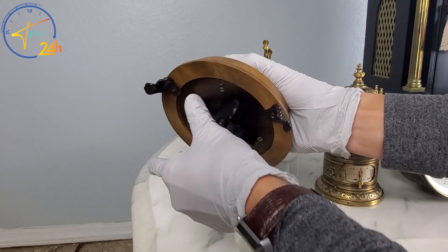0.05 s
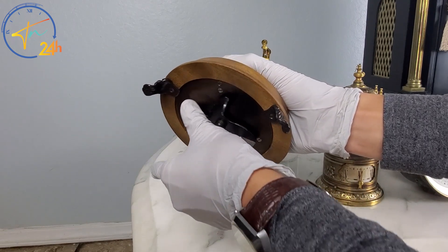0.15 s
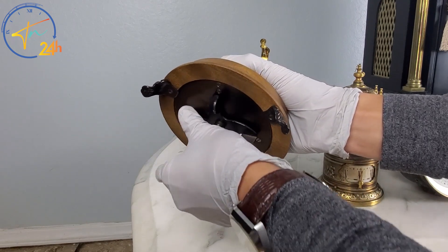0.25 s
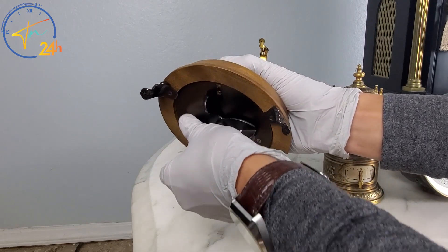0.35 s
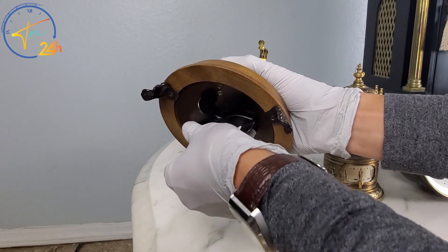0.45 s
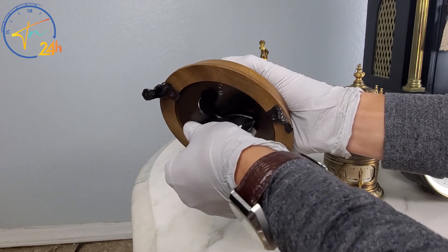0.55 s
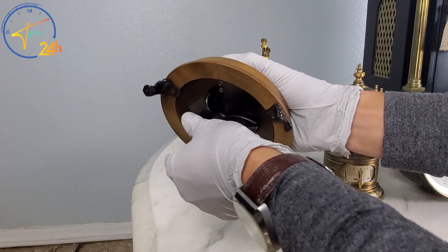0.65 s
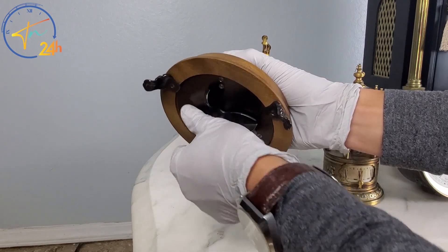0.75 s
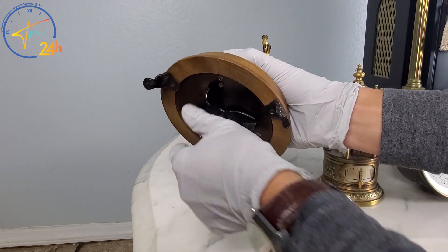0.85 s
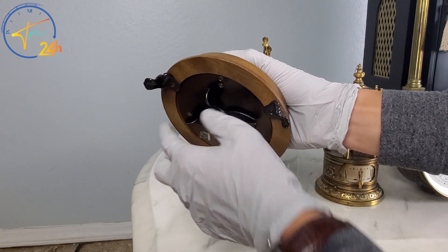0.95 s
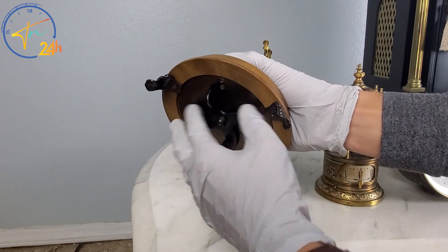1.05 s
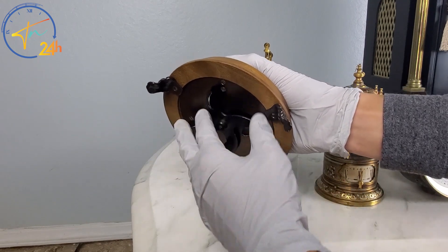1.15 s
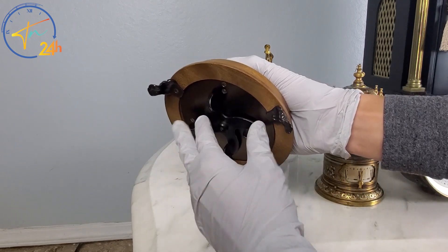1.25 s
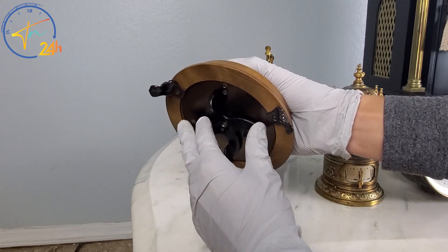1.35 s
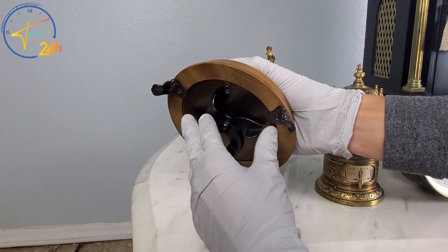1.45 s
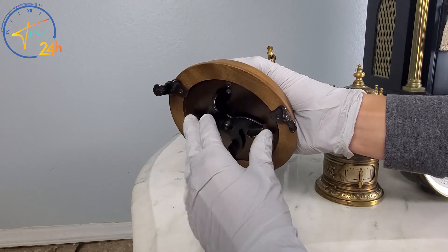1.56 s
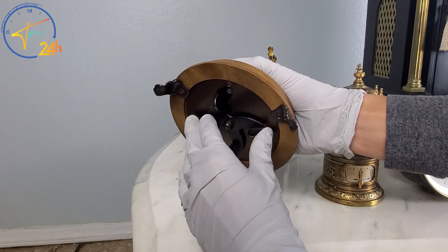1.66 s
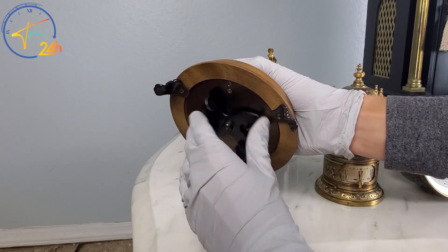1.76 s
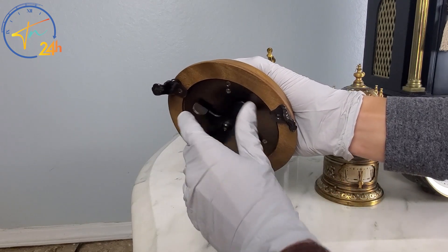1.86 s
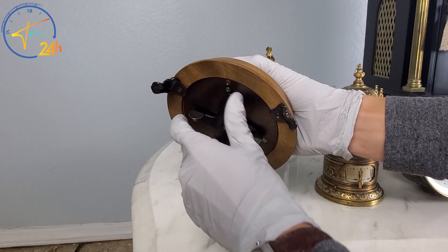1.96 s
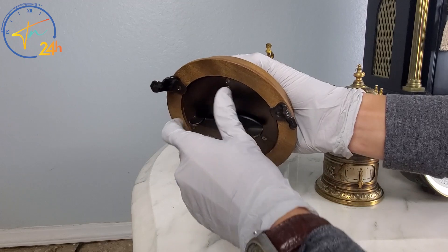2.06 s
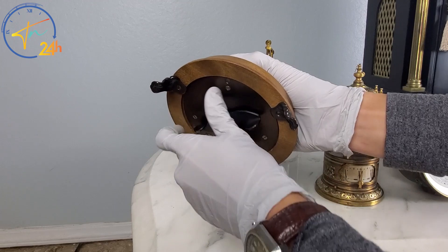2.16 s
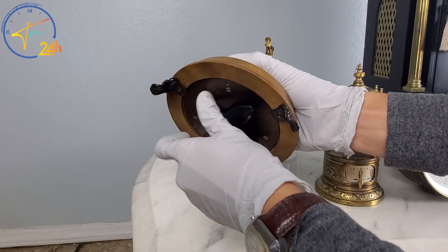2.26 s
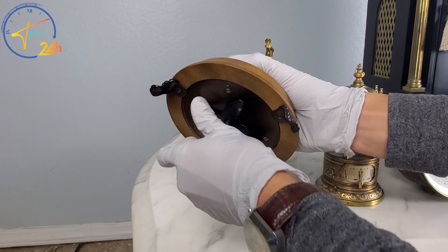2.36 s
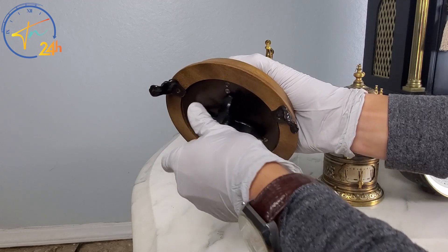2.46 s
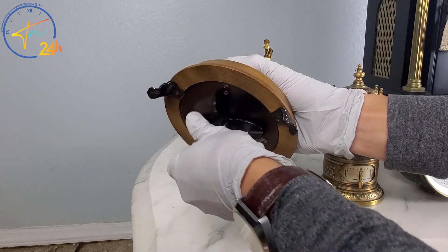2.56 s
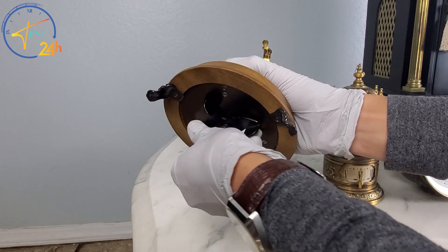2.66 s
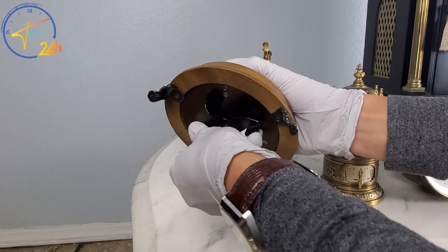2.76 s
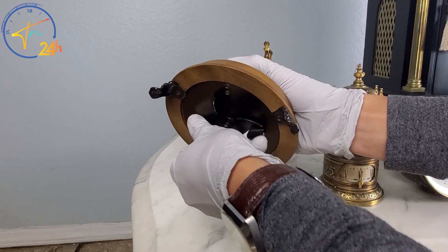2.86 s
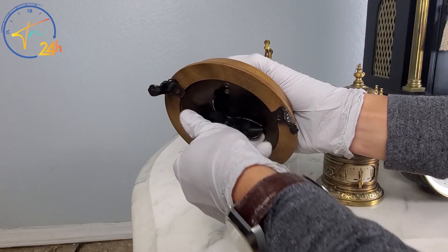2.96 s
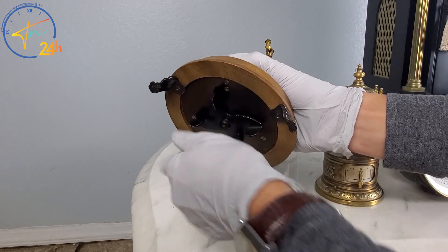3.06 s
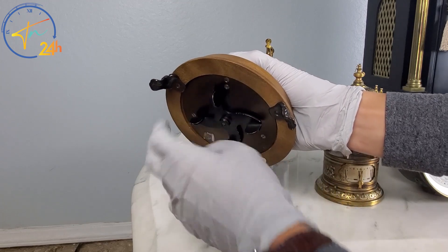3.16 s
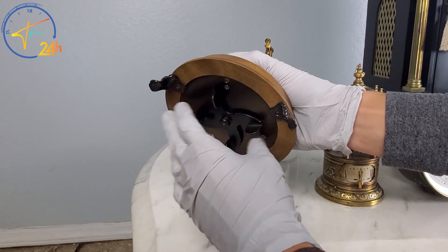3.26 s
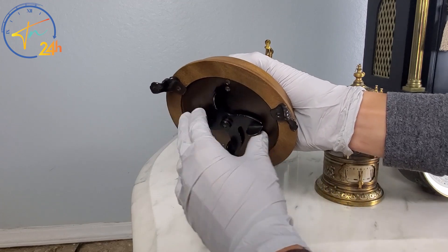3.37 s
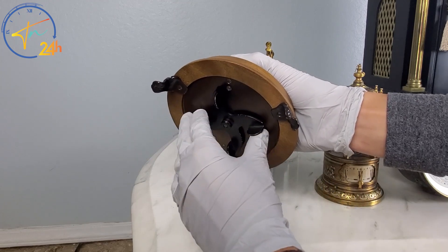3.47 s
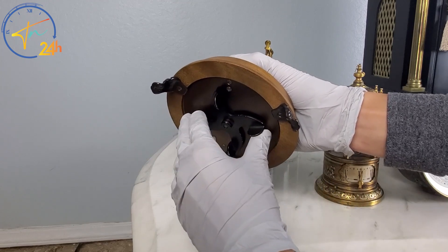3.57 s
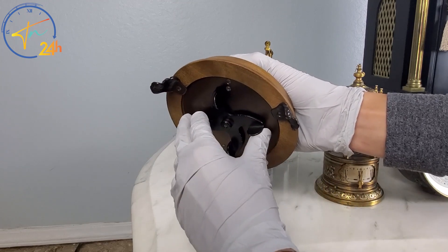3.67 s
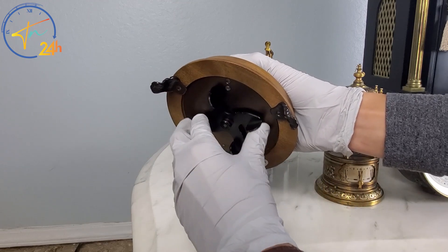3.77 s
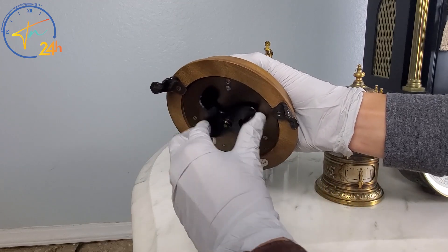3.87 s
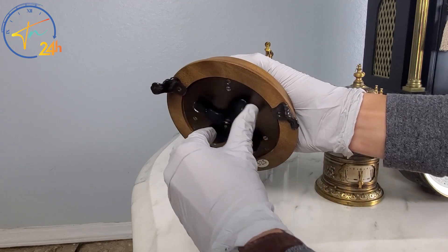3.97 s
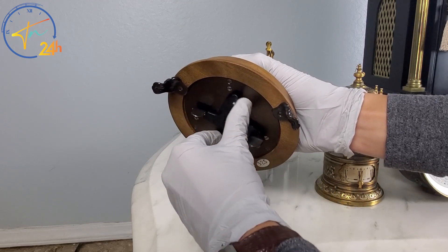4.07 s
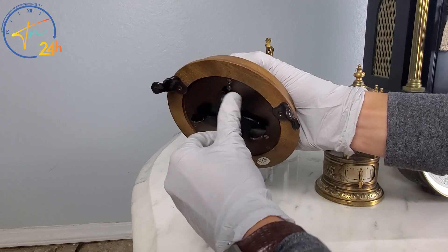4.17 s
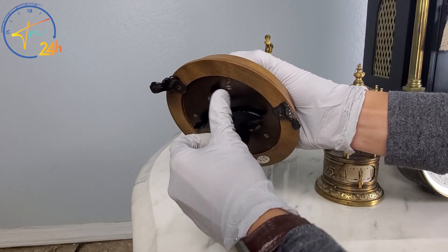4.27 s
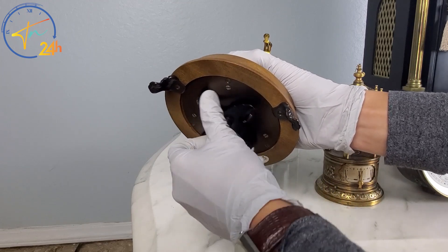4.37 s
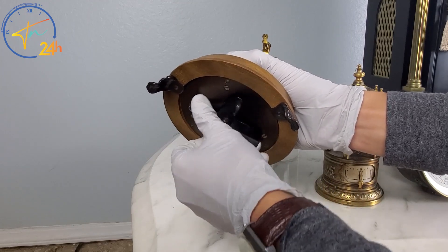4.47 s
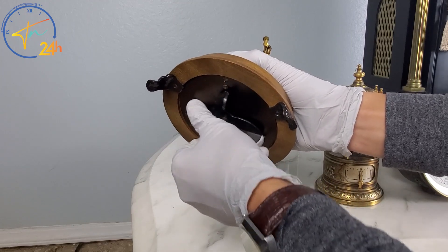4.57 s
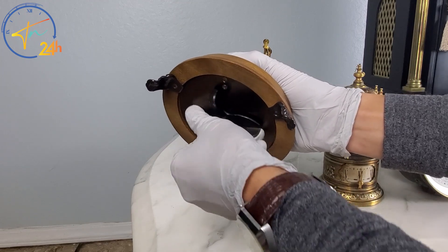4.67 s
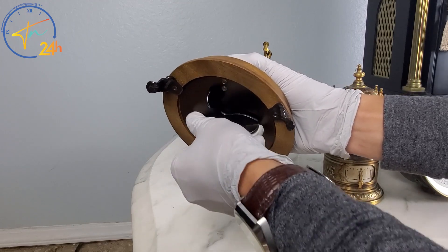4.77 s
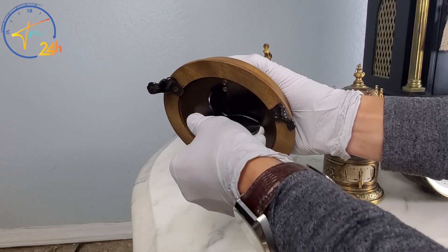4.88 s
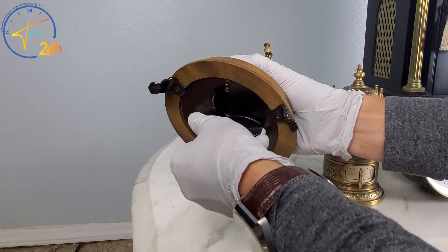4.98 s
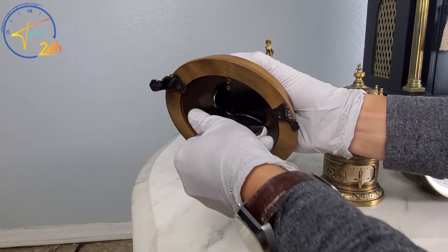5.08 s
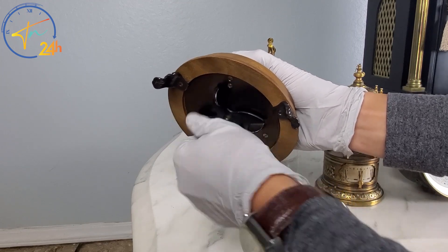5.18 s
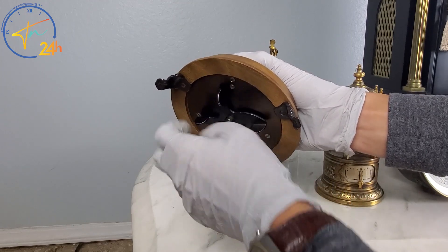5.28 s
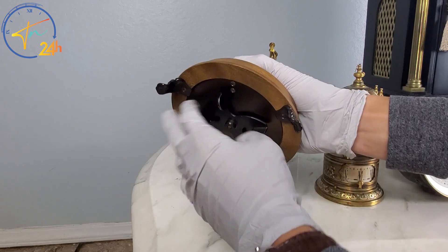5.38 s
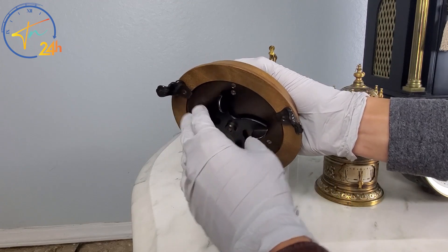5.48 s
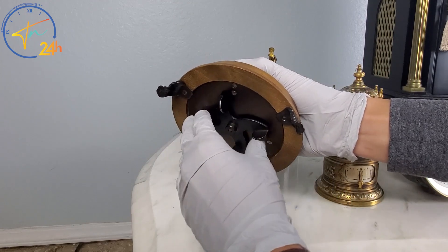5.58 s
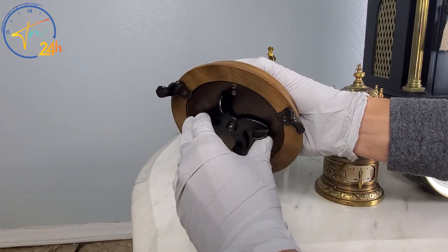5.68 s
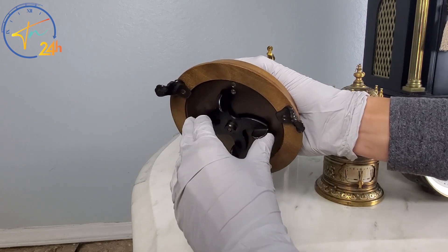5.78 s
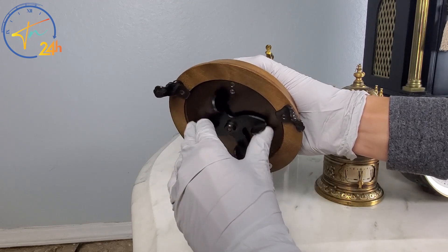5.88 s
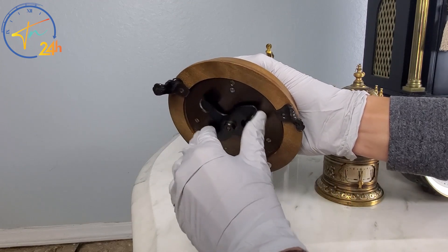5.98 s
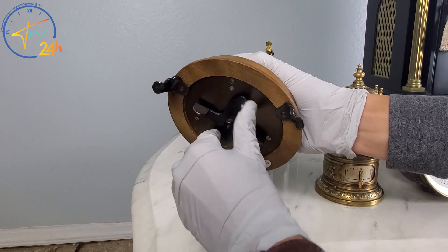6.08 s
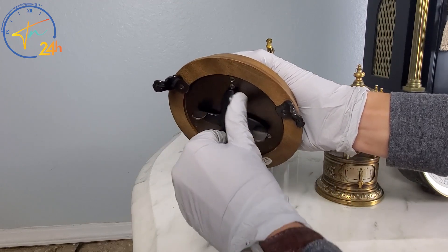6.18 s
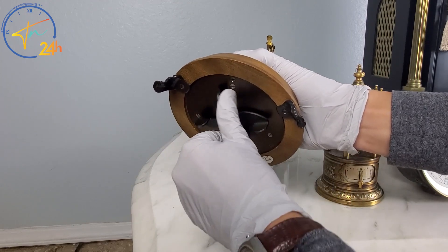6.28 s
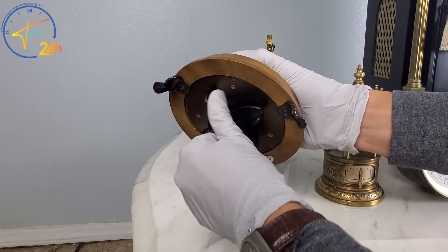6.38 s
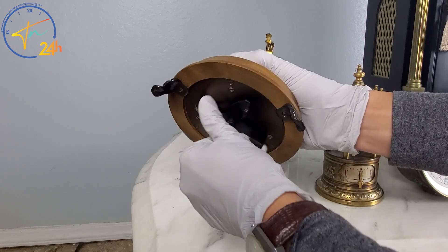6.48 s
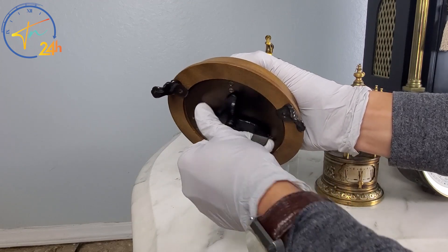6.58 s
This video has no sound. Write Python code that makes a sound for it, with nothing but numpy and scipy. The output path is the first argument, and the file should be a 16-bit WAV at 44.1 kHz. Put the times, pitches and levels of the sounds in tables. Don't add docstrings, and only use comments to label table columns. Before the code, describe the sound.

A small clock is wound by hand in four half turns, each a rapid run of bright ratchet clicks, with key clacks between.

```python
import sys
import numpy as np
from scipy import signal
from scipy.io import wavfile

SR = 44100
rng = np.random.default_rng(int(sys.argv[2]) if len(sys.argv) > 2 else 0)


def magnitude_from_level(level_db):
    exponent = np.asarray(level_db, float) / 20
    return 10 ** exponent


def waveform_to_disk(signal):
    frames = np.transpose(np.atleast_2d(signal))
    scaled = np.clip(frames, -1, 1) * 32767
    samples = np.round(scaled).astype(np.int16)
    wavfile.write(sys.argv[1], SR, samples)


N = 292383

# (f/Hz, level/dB per Hz)
AIR = [(13, -60), (22, -28.5), (43, -3), (87, 0.5), (100, -7.5), (118, -13.5), (294, -13.5), (1040, -27),
       (1130, -25.5), (2320, -31), (5310, -38.5), (7810, -43), (10600, -55), (14700, -28.5), (16000, -50)]
AIR_DB = -58.5
# (f/Hz, width/Hz, level/dB)
DRONES = [(86.1, 5.9, -62.5), (106, 25, -79), (299.2, 17, -70), (356.8, 7.5, -72.5), (391.5, 29, -69.5)]
# (f/Hz, correlation)
LIKENESS = [(60, 0.97), (99, 0.96), (160, 0.92), (270, 0.24), (450, -0.64), (740, -0.48), (1220, -0.63),
            (2010, -0.3), (3330, -0.04), (5500, -0.26), (9080, 0.16), (15000, -0.095)]
# (f/Hz, left-right/dB)
SIDES = [(60, -1), (180, -2.5), (550, 0), (1650, -1.5), (4970, -5.5), (15000, -4.5)]
# (delay/ms, left level/dB, right level/dB)
ECHOES = [(2.7, -12, -13), (5.7, -9, -17), (12.6, -14, -20), (17.5, -22, -23), (23.5, -21, -22),
          (28, -21, -26)]
# (f/Hz, t60/s)
ROOM_T60 = [(500, 0.43), (2000, 0.44), (5500, 0.36), (9000, 0.3), (15000, 0.25)]

# (f/Hz, level/dB per Hz)
GLOVE = [(1470, -54), (2500, -7.5), (3460, -17), (3720, -15.5), (7020, 0.5), (10000, -11.5), (15000, 4),
         (16000, -23)]
# (t/s, level/dB)
GRIP = [(0.0, -65.5), (0.81, -63), (1.09, -69), (1.42, -86), (1.73, -75), (2.16, -61), (2.66, -62),
        (2.76, -66), (3.05, -66.5), (3.43, -79), (3.72, -83), (3.91, -66), (4.43, -62.5), (4.95, -73.5),
        (5.34, -63), (5.6, -83), (5.86, -86), (6.0, -67.5), (6.63, -58)]
# (t/s, length/s, level/dB)
SWIPES = [
    (0.88, 0.058, -77),
    (1.384, 0.034, -72),
    (1.54, 0.017, -72),
    (1.718, 0.035, -51),
    (3.09, 0.13, -71),
    (3.347, 0.037, -72.5),
    (5.222, 0.04, -53),
    (5.408, 0.011, -75),
]
# (t/s, peak level/dB, length/ms)
KNOCKS = [(0.097, -53, 2.3), (0.138, -51, 6), (0.158, -56, 4), (2.158, -44.5, 3.3), (2.172, -50, 3),
          (2.185, -38.5, 2.1), (2.196, -40.5, 1.3), (2.21, -52.5, 2.5), (2.223, -52, 4.0), (2.238, -57, 3),
          (2.295, -54.5, 1.8), (2.811, -55.5, 7.8), (6.226, -56.5, 2.7)]
# (t/s, peak level/dB)
TICKS = [
    (0.9887, -50),
    (3.3413, -67),
    (5.3433, -64),
    (5.404, -56),
    (5.7162, -56.5),
]
# (t/s, peak level/dB, left-right/dB, bright edge level/dB, rattle/ms)
SLACK = [(0.5692, -35, -6.5, -55, 5), (0.6414, -44.5, 0, -55, 3.7), (1.693, -32, -6, -42, 8.5),
         (1.714, -44, -5, -63, 7.7), (2.7605, -32, -1, -51.5, 4.2), (2.8088, -49, -4, -54, 4),
         (3.7018, -53.5, -7, -75.5, 3.3), (3.7403, -31.5, -7.5, -47, 4), (3.7958, -47, -6, -71, 5),
         (4.738, -59, -5, -72, 6), (4.8851, -33.5, -1, -56.5, 3.4), (4.906, -65, -13, -58, 2.7),
         (4.945, -52, -6, -72, 4), (5.8565, -32.5, -9, -42, 4.1)]

HOLLOW = [(506, 100, -6.5), (827, 66, -1.5), (1000, 150, 4.5), (1287, 48, -5), (1510, 280, 4),
          (2350, 400, 3.5), (2260, 450, -9)]
# (f/Hz, width/Hz, level/dB)
CASE = [(1461, 62, -13), (1688, 180, -12.5), (1920, 260, -10.5), (2082, 290, -2), (2434, 250, -1),
        (2685, 1200, -3), (2080, 47, -10.5), (2217, 43, -15), (2258, 90, -17)]
# (f/Hz, width/Hz, level/dB)
RIM = [(3000, 120, -8.5), (3460, 540, -4.5), (2980, 32, -18), (3070, 44, -12.5)]
# (f/Hz, width/Hz, level/dB)
PLATE = [(4500, 350, -9), (5027, 250, -4.5), (5220, 194, 2.5)]
# (f/Hz, width/Hz, level/dB)
SPRING = [(5470, 420, -5.5), (5746, 170, 3), (6470, 420, -6.5)]
# (f/Hz, width/Hz, level/dB)
BEZEL = [(3580, 228, 2), (4160, 167, -14.5)]
# (f/Hz, level/dB)
EDGE = [(7250, -2), (8400, 0), (10400, 2), (12300, 7), (14500, 4)]

# (t/s, snap peak level/dB, left-right/dB, plate ring level/dB)
TURN_A = [
    (0.0135, -24, -11, -53),
    (0.139, -25, -10, -40.5),
    (0.2737, -32, -15, -41),
    (0.387, -14.5, -9, -36),
]
# (t/s, snap peak level/dB, left-right/dB, plate ring level/dB)
TURN_B = [(1.771, -19.5, -16, -40.5), (1.8375, -13, 14.5, -33), (1.918, -15.5, -12, -30.5),
          (2.01, -8.5, -1, -31), (2.1078, -9.5, -8.5, -31), (2.183, -33.5, -6, -59),
          (2.2025, -14, -9.5, -62), (2.2939, -16, -15.5, -36.5), (2.4121, -18, -13, -48.5),
          (2.5085, -12.5, 0.5, -41), (2.6, -11, -19, -39.5)]
# (t/s, snap peak level/dB, left-right/dB, plate ring level/dB)
TURN_C = [(3.8681, -16, -6, -35), (3.9515, -24, -19, -33.5), (4.0709, -26.5, -31, -34.5),
          (4.173, -13, -6, -29.5), (4.2614, -11, -8.5, -37), (4.349, -23, -13, -37),
          (4.4258, -23, -12, -33.5), (4.523, -16.5, -20.5, -32), (4.6326, -27, 8, -37),
          (4.783, -25, -11, -45)]
# (t/s, snap peak level/dB, left-right/dB, plate ring level/dB)
TURN_D = [
    (5.9411, -24, -9, -30),
    (6.0278, -22, -15, -30),
    (6.119, -15, -13, -30.5),
    (6.2115, -9.5, -4, -28),
    (6.299, -11.5, -6, -32),
    (6.3858, -14, -12.5, -31),
    (6.464, -22, -13, -34),
    (6.55, -12.5, -4.5, -31),
]
TURNS = [TURN_A, TURN_B, TURN_C, TURN_D]
TURN_FORCE_DB = [-41.5, -37.5, -41, -39.5]

LEAD_S = 0.015
SNAP_HZ, SNAP_SPREAD_HZ, SNAP_S = 14260, 410, 0.00014
REBOUND_MS, REBOUND_DB, REBOUND_PITCH = 0.457, -5.0, 0.91
PLATE_USUAL_DB = -39
SPRING_DB, SPRING_SHARE = -44, -0.024
BEZEL_DB, BEZEL_SHARE = -50, 0.15
CASE_DB, CASE_SHARE = -47.5, -0.25
RIM_UNDER_DB, RIM_TAKE_UP_DB = -15.5, 4.5
PLATE_HUM_DB, PLATE_HUM_SHARE, SPRING_HUM_DB, CASE_HUM_DB = -67.5, 0.6, -61, -66.5
SLACK_HUM_DB, KNOCK_HUM_DB = -31, -14
CASE_REST_DB, IDLE_HUM_DB = -81.5, -100
HUM_T60_S, CASE_HUM_T60_S = 0.45, 0.32
LET_GO_S, LET_GO_DB = 0.25, -19
CLACK_RING_DB, CLACK_RING_T60_S = -28, 0.69
STEADY_TOP_HZ, ATTACK_TOP_HZ = 15820, 16450


def rms_one(x):
    return x / np.sqrt(np.mean(x ** 2) + 1e-20)


def at_hz(points, hz):
    table_hz, values = np.array(points).T
    return np.interp(np.log(hz), np.log(table_hz), values)


def panned(db):
    return magnitude_from_level(np.array([[db / 2], [-db / 2]]))


def bandpass(x, low, high, order=2):
    return signal.sosfilt(signal.butter(order, [low, high], "band", fs=SR, output="sos"), x)


def spread(mid, side, hz):
    alike = np.clip(at_hz(LIKENESS, hz), -1, 1)
    return np.sqrt(1 + alike) * mid + np.sqrt(1 - alike) * side * [[1], [-1]]


def drift(rate):
    r = np.exp(-80 * np.pi * rate / SR)
    slow = signal.lfilter([1], [1, -2 * r, r * r], rng.standard_normal(N // 40 + 2002))[2000:]
    return np.interp(np.arange(N) / 40, np.arange(len(slow)), rms_one(slow))


def banded_noise(spectrum, patchy_db):
    out = 0
    edges = 21 * 2 ** np.arange(0, 9.7, 1 / 3)
    white = rng.standard_normal((2, 2, N))
    flicker = [drift(8.1) for k in range(4)]
    for k, (low, high) in enumerate(zip(edges, edges[1:])):
        hz = np.sqrt(low * high)
        if hz < spectrum[0][0] * 1.2 or low > 16500:
            continue
        mid, side = bandpass(white[k % 2], low, high)
        gain = magnitude_from_level(at_hz(spectrum, hz) + patchy_db * flicker[k % 4]) * panned(at_hz(SIDES, hz))
        out = out + gain * spread(mid, side, hz)
    return rms_one(out)


def resonance(x, hz, width_hz):
    r = np.exp(-np.pi * width_hz / SR)
    poles = [1, -2 * r * np.cos(2 * np.pi * hz / SR), r * r]
    return signal.lfilter([(1 - r * r) / 2, 0, (r * r - 1) / 2], poles, x)


def contact(ms, grit_db, tail_db, tail_t60, lead_db=-99, size=6000):
    t = np.arange(size) / SR - LEAD_S
    late = np.maximum(t, 0) * 1000 / max(ms, 0.05)
    blow = magnitude_from_level(grit_db * rng.standard_normal(size)) * np.sqrt(late) * np.exp(-late)
    shape = blow / np.sqrt(np.sum(blow ** 2))
    shape += np.where(t > 0, magnitude_from_level(tail_db - 60 * t / tail_t60), magnitude_from_level(lead_db + 60 * t / 0.037))
    return shape * rng.standard_normal((2, size))


def strike(modes, blow, spread_db):
    out = 0
    for (hz, width_hz, db), luck in zip(modes, rng.standard_normal((len(modes), 2, 1))):
        width_hz = max(width_hz, 12)
        rung = resonance(resonance(blow, hz, width_hz), hz, max(4 * width_hz, hz / 5))
        wanted = np.sum(blow ** 2) * SR / (8 * np.pi * width_hz)
        even = np.sqrt(wanted / np.sum(rung ** 2, axis=1, keepdims=True))
        out = out + magnitude_from_level(db + spread_db * luck) * even * rung
    return out


def add(track, s, sound):
    i = round(s * SR)
    sound = sound[:, max(-i, 0):N - i]
    track[:, max(i, 0):max(i, 0) + sound.shape[1]] += sound


def air():
    out = magnitude_from_level(AIR_DB) * banded_noise(AIR, patchy_db=2.5)
    for hz, width_hz, db in DRONES:
        mid, side = rng.standard_normal((2, N))
        out += magnitude_from_level(db) * rms_one(resonance(spread(mid, side, hz), hz, width_hz))
    return out


def room(x, early_db, late_db):
    t = np.arange(SR // 2) / SR
    edges = 350 * 2 ** np.arange(0, 6, 0.5)
    response = magnitude_from_level(early_db - 60 * t / 0.074) * rng.standard_normal((2, len(t)))
    white = rng.standard_normal((2, len(t)))
    for low, high in zip(edges, edges[1:]):
        decay = magnitude_from_level(late_db - 60 * t / at_hz(ROOM_T60, np.sqrt(low * high)))
        response += decay * bandpass(white, low, high)
    response *= np.clip(t / 0.0019, 0, 1)
    for ms, left_db, right_db in ECHOES:
        response[:, round(ms * SR / 1000)] += magnitude_from_level(np.array([left_db, right_db]))
    return signal.oaconvolve(x, response, axes=1)[:, :N]


def rustle():
    t = np.arange(N) / SR
    level = magnitude_from_level(np.interp(t, *np.transpose(GRIP)) - 5)
    for s, length, db in SWIPES:
        corners = [s - 0.008, s, s + length, s + length + 0.008]
        level += magnitude_from_level(db) * np.interp(t, corners, [0, 0.55, 1, 0])
    return level * magnitude_from_level(2.5 * drift(89.0)) * banded_noise(GLOVE, patchy_db=-2.0)


def knocks():
    out = np.zeros((2, N))
    for s, db, ms in KNOCKS:
        blow = contact(ms, grit_db=2.5, tail_db=-34.5, tail_t60=0.22)
        add(out, s - LEAD_S, magnitude_from_level(db + 0.5) * strike(HOLLOW, blow, spread_db=0.5))
    for s, db in TICKS:
        blow = contact(0.8, grit_db=4.0, tail_db=-36, tail_t60=0.03, size=2000)
        add(out, s - LEAD_S, magnitude_from_level(db + 4.0) * resonance(blow, 6600, 4300) * 4)
    return out


def key_slack():
    out = np.zeros((2, N))
    bright = signal.butter(2, 3500, "high", fs=SR, output="sos")
    starts = np.array([turn[0][0] for turn in TURNS[1:]])
    for s, db, pan, edge_db, ms in SLACK:
        taking_up = np.any((starts > s) & (starts - s < 0.2))
        rim_db = db + RIM_UNDER_DB + RIM_TAKE_UP_DB * taking_up
        blow = contact(ms * 0.3, grit_db=4.0, tail_db=-36, tail_t60=0.2, lead_db=-31)
        ring = magnitude_from_level(db - 2.5) * strike(CASE, blow, spread_db=6.5)
        ring += magnitude_from_level(rim_db + 9.0) * strike(RIM, blow, spread_db=-5.5)
        add(out, s - LEAD_S, panned(pan) * ring)
        blow = contact(ms * 0.73, grit_db=11.5, tail_db=-35.5, tail_t60=0.16, lead_db=-31.5, size=4000)
        movement = strike(PLATE + SPRING + BEZEL, blow, spread_db=2.0)
        edge = signal.sosfilt(bright, blow) * 6.1 + movement * 0.065
        add(out, s - LEAD_S, magnitude_from_level(edge_db + 13) * panned(-5) * edge)
    return out


def teeth():
    return [(*row, force) for turn, force in zip(TURNS, TURN_FORCE_DB) for row in turn]


def lingering(s, db, t60, rest_db):
    kicks = np.full(N, 1e-18)
    kicks[(np.array(s) * SR).astype(int)] = magnitude_from_level(2 * np.array(db))
    power = signal.lfilter([1], [1, -magnitude_from_level(-120 / (t60 * SR))], kicks)
    return np.sqrt(power + magnitude_from_level(2 * rest_db))


def hum():
    s, _, _, plate_db, force_db = np.transpose(teeth())
    force_db = force_db - force_db.mean()
    clack_s, clack_db = np.transpose(SLACK)[:2]
    knock_s, knock_db = np.transpose(KNOCKS)[:2]
    spans = [(turn[0][0] - 0.01, turn[0][0], turn[-1][0], turn[-1][0] + LET_GO_S) for turn in TURNS]
    turning = magnitude_from_level(np.interp(np.arange(N) / SR, np.ravel(spans), [LET_GO_DB, 0, 0, LET_GO_DB] * 4))

    free_db = PLATE_HUM_SHARE * (plate_db - PLATE_USUAL_DB)
    plate_level = turning * lingering(s, PLATE_HUM_DB + free_db, HUM_T60_S, IDLE_HUM_DB)
    spring_level = turning * lingering(s, SPRING_HUM_DB + force_db, HUM_T60_S, IDLE_HUM_DB)
    case_s = [*s, *clack_s, *knock_s]
    case_db = [*(CASE_HUM_DB + force_db), *(clack_db + SLACK_HUM_DB), *(knock_db + KNOCK_HUM_DB)]
    case_level = lingering(case_s, case_db, CASE_HUM_T60_S, CASE_REST_DB)
    clack_level = lingering(clack_s, clack_db + CLACK_RING_DB, CLACK_RING_T60_S, IDLE_HUM_DB)

    rough = magnitude_from_level(2.0 * drift(70.0))

    def rubbed(modes):
        return rms_one(strike(modes, rng.standard_normal((2, N)) * rough, spread_db=5.0))

    movement = plate_level * rubbed(PLATE[1:2]) + spring_level * rubbed(SPRING[:2])
    movement = bandpass(movement, 4750, 6050, order=3)
    case = case_level * rubbed(CASE[3:4] + RIM[:1])
    clear_lines = clack_level * rubbed(CASE[7:8] + RIM[2:3])
    return (movement + case + clear_lines) * panned(-2)


def snap(hz, late_s):
    t = (np.arange(132) - 36) / SR - late_s
    return np.cos(2 * np.pi * hz * t) * np.exp(-np.abs(t / SNAP_S) ** 1.3)


def ratchet():
    beam, body = np.zeros((2, N)), np.zeros((2, N))
    scatter = [(hz, hz / 6, db) for hz, db in EDGE]
    drops = teeth()
    for (s, db, pan, plate_db, edge_db), luck in zip(drops, rng.random((len(drops), 3))):
        hz = SNAP_HZ + SNAP_SPREAD_HZ * (2 * luck[1] - 1)
        rebound = snap(hz * REBOUND_PITCH, REBOUND_MS / 1000 * (0.5 + luck[2]))
        tip = snap(hz, 0) + magnitude_from_level(REBOUND_DB) * rebound
        tip = np.array([np.roll(tip, 3 + round(6 * luck[0])), tip])
        add(beam, s + 0.0003, magnitude_from_level(db - 1.0) * panned(pan) * tip)

        free_db = plate_db - PLATE_USUAL_DB
        spring_db = SPRING_DB + SPRING_SHARE * free_db
        bezel_db = BEZEL_DB + BEZEL_SHARE * free_db
        case_db = CASE_DB + CASE_SHARE * free_db
        blow = contact(0.58, grit_db=4.0, tail_db=-28, tail_t60=0.046, lead_db=-32.5, size=3000)
        sound = magnitude_from_level(edge_db + 9) * panned(-5.5) * strike(scatter, blow, spread_db=2.0)
        sound += magnitude_from_level(plate_db - 2) * panned(2) * strike(PLATE, blow, spread_db=1.5)
        sound += magnitude_from_level(spring_db) * panned(-16) * strike(SPRING, blow, spread_db=4.0)
        sound += magnitude_from_level(bezel_db) * panned(-1) * strike(BEZEL, blow, spread_db=7.0)
        sound += magnitude_from_level(case_db) * panned(-2.2) * strike(CASE + RIM[2:], blow, spread_db=2.0)
        add(body, s + 0.00073 - LEAD_S, sound)
    return beam, body


def scene():
    beam, body = ratchet()
    body = body + key_slack() + knocks()
    into_room = np.array([[0.25, 0.66], [0.45, -1.07]]) @ (body + 0.27 * beam)
    steady = body + room(into_room, early_db=-35, late_db=-34.5) + hum() + rustle() + air()
    top_cut = signal.ellip(8, 0.1, 25, STEADY_TOP_HZ, fs=SR, output="sos")
    return beam + signal.sosfiltfilt(top_cut, steady)


def roll_off(x):
    return signal.sosfilt(signal.butter(12, 16990, fs=SR, output="sos"), x)


def record(dry):
    top_cut = signal.ellip(6, 0.2, 35, ATTACK_TOP_HZ, fs=SR, output="sos")
    return roll_off(signal.sosfiltfilt(top_cut, dry))


dry = scene()
out = record(dry)
waveform_to_disk(out)
```